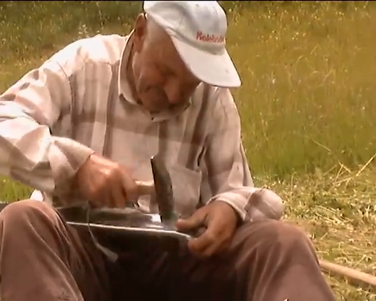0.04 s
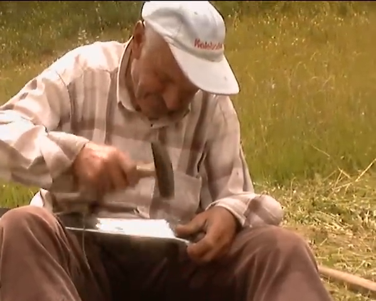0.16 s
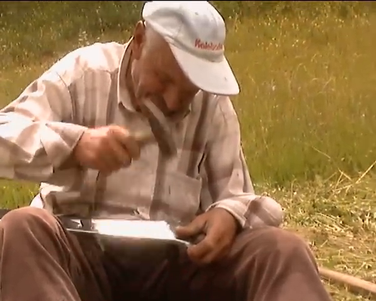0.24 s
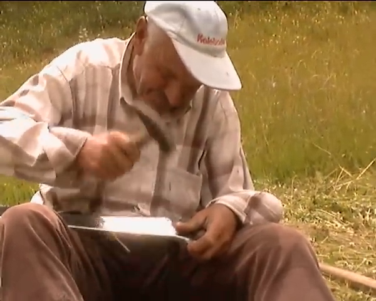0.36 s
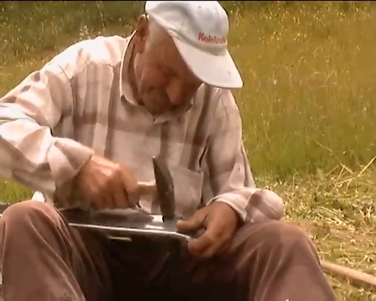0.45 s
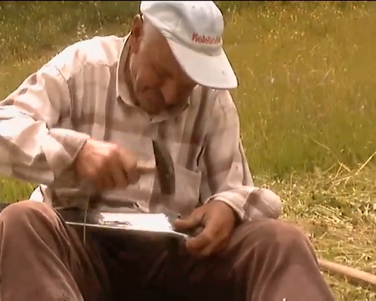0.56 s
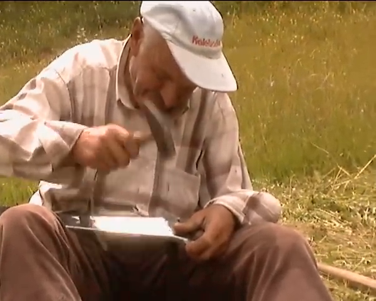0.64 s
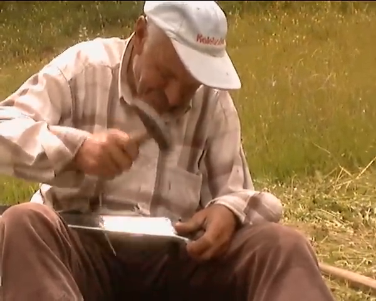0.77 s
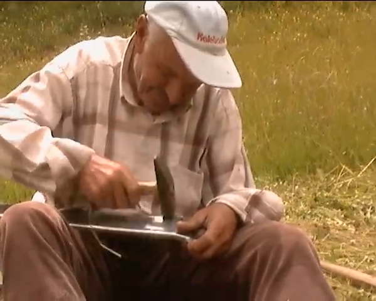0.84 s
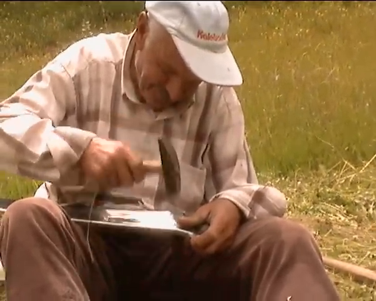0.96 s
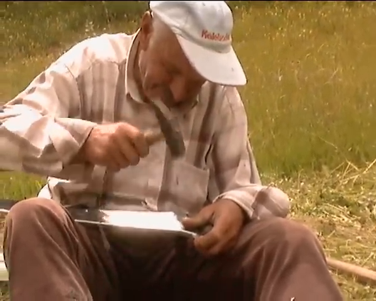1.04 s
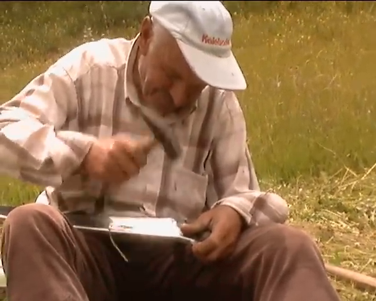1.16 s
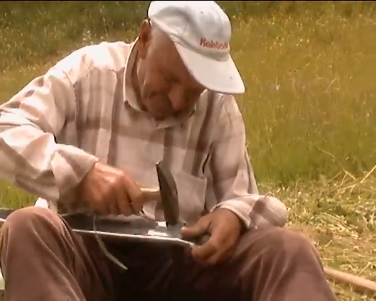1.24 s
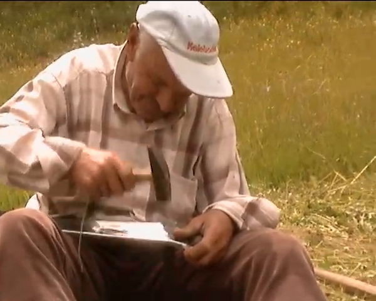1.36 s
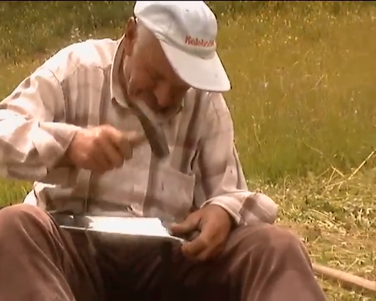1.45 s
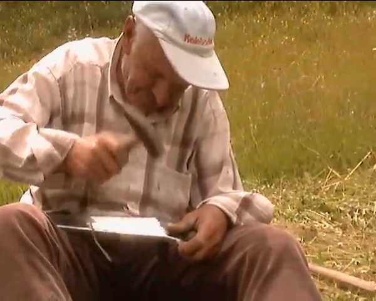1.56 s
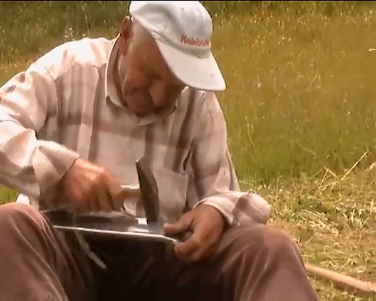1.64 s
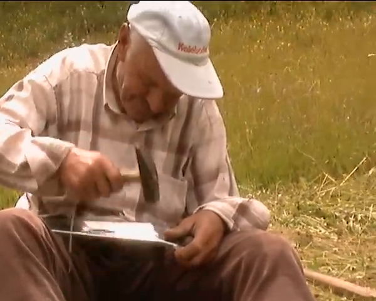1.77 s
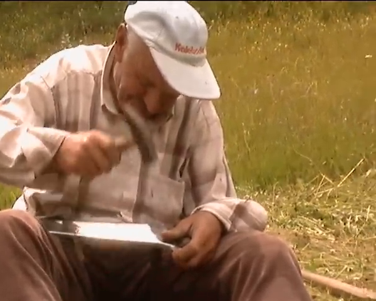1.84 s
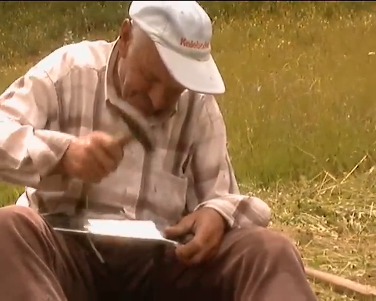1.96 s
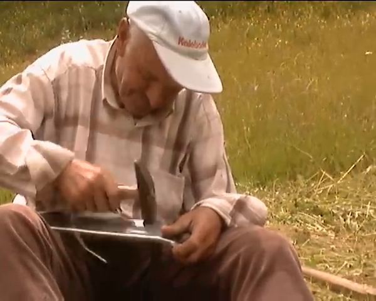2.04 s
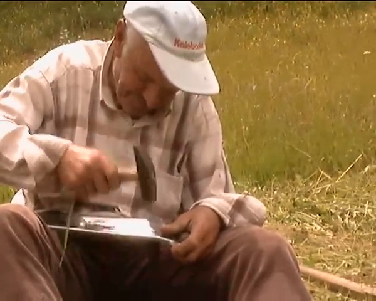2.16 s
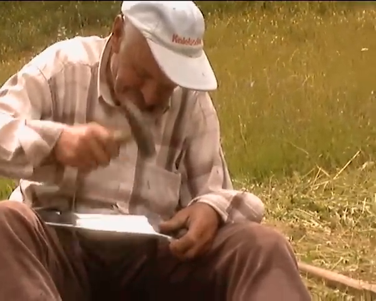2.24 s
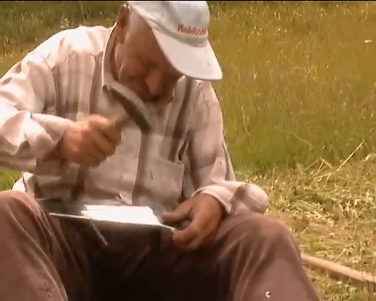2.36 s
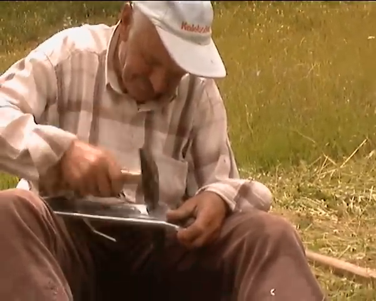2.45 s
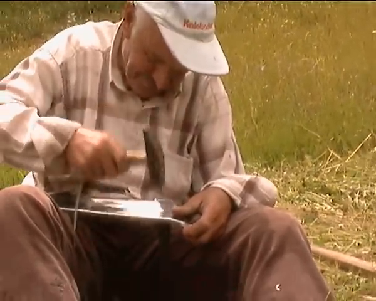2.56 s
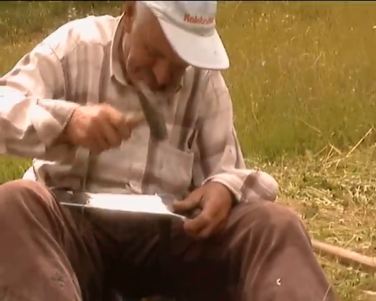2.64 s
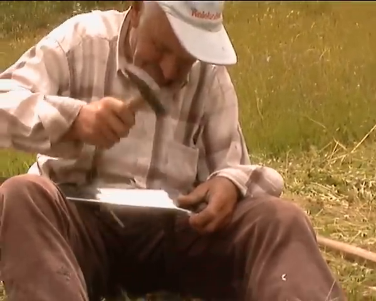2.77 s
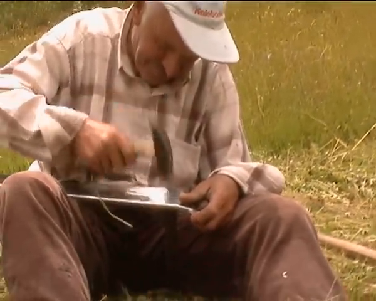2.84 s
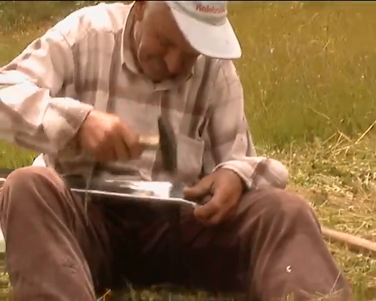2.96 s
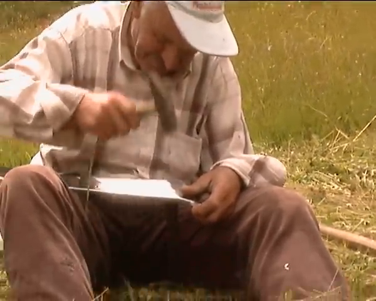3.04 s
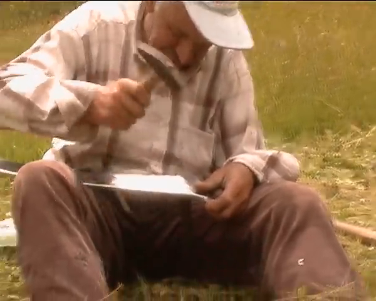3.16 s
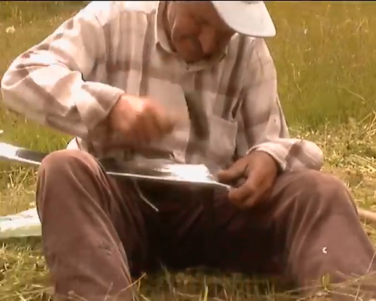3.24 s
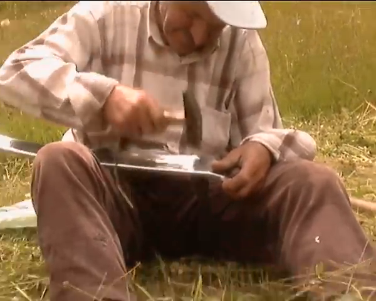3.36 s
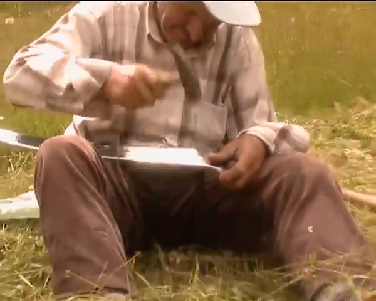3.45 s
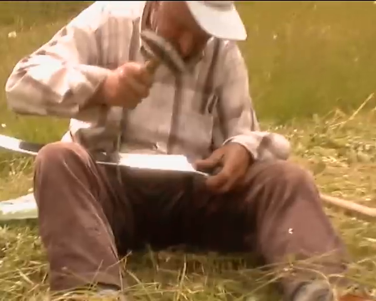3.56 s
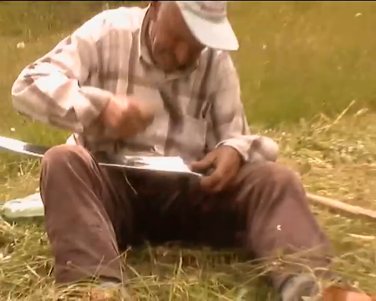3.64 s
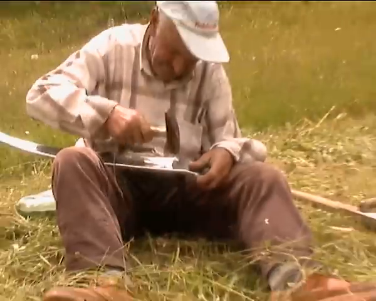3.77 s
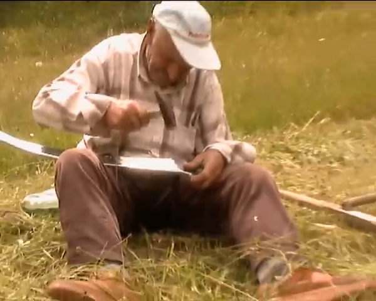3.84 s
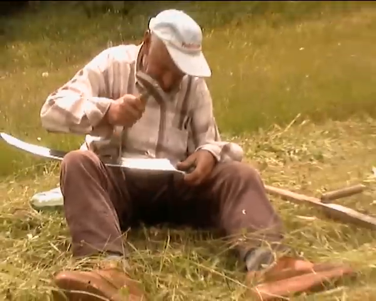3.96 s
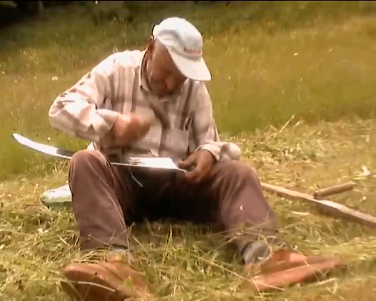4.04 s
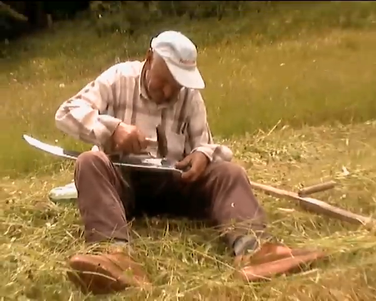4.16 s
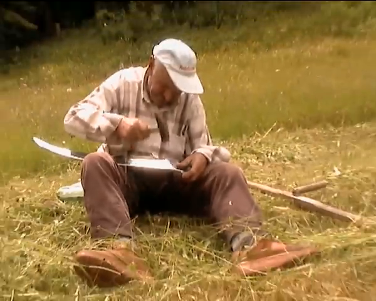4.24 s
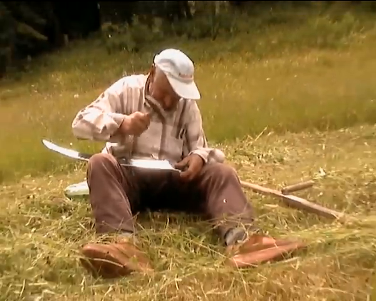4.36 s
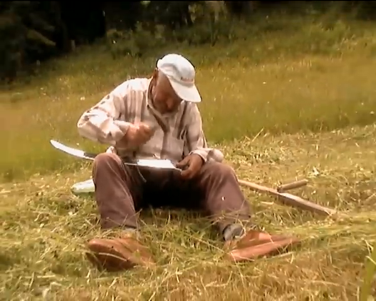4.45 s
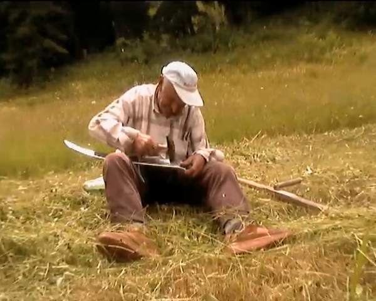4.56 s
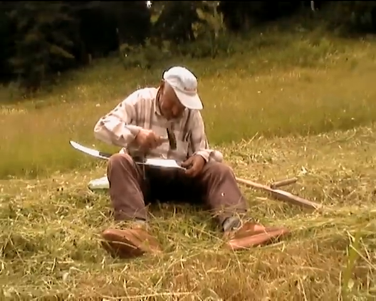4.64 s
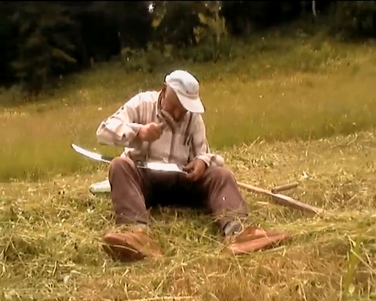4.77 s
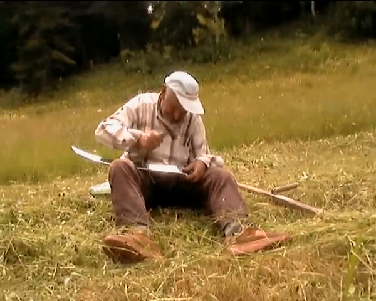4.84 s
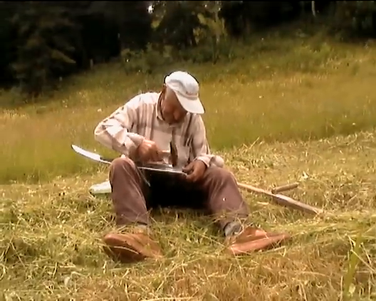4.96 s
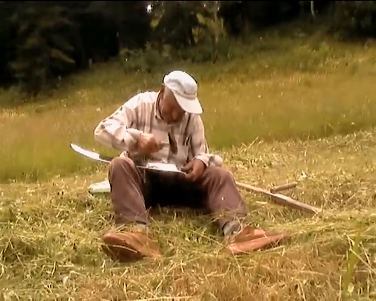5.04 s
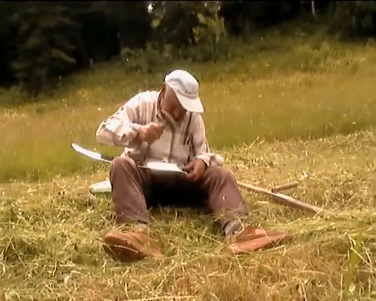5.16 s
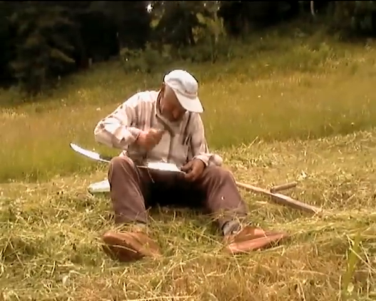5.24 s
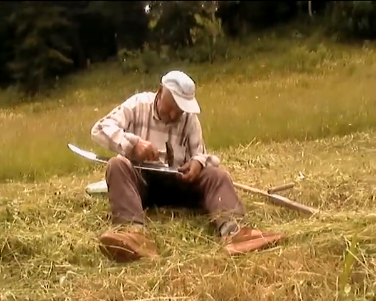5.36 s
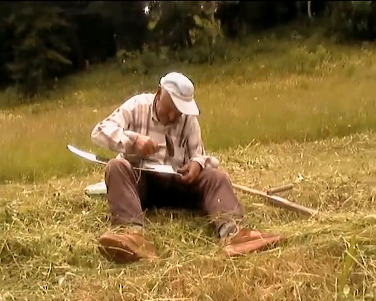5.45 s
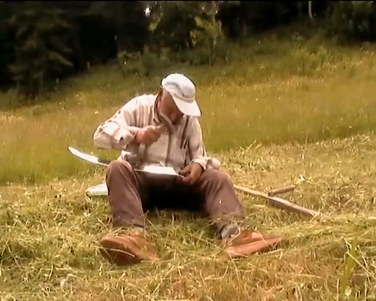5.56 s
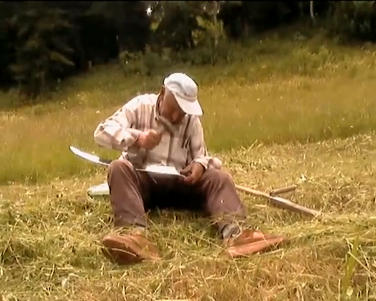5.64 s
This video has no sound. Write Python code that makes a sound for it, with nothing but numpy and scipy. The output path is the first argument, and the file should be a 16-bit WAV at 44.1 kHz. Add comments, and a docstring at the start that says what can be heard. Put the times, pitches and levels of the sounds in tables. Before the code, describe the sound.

Evenly paced hammer blows on a scythe edge, sharp crack then short shimmering ring, over faint outdoor hush and light breeze.

```python
"""A small hammer peens a scythe blade on an anvil, blow by blow, drawing out its edge in a still meadow.
Each blow is a burst of damped steel modes and grit, a thud in the soil and a softer knock as the blade drops back.
The hand-held blade rings in damped sines whose balance shifts as the edge is fed along; it also shimmers and rattles.
One blow buzzes and faint creaks pass midway, over a steady hush and a breeze made of coloured noise.
A gain control ducks the loud cracks and recovers while the blade rings."""
import sys
import numpy as np
from scipy import signal
from scipy.fft import rfft, irfft, next_fast_len
from scipy.io import wavfile
from scipy.ndimage import map_coordinates

SR = 44100
rng = np.random.default_rng(int(sys.argv[2]) if len(sys.argv) > 2 else 0)


def store_wav(level_fs):
    """Save 16-bit WAV to argv[1]."""
    pcm = np.round(np.clip(np.atleast_2d(level_fs), -1, 1) * 32767)
    wavfile.write(sys.argv[1], SR, pcm.T.astype(np.int16))


N = 251370  # length [samples]

# Levels are in dB; hammer, blade, shimmer, rattle and meadow add a loudness of their own,
# buzzes and creaks play at their table levels.
# hammer blows: (time [s], ring level [dB], low hum level [dB], singing mode [Hz], singing level [dB])
BLOWS = [(0.0612, -7.5, 5.5, 1651, -58), (0.4712, 6, 0, 1650, -46), (0.8737, 2.5, -3.5, 1653, -49.5),
         (1.266, -4, 6, 1663, -82), (1.6667, 0.5, 1.5, 1668, -54), (2.0755, 2.5, 3, 1670, -48.5),
         (2.4843, 3, -0.5, 1675, -51.5), (2.8975, 3, 8.5, 1680, -66), (3.3046, 2.5, 3, 1682, -39.5),
         (3.714, 1.5, 11, 1685, -78), (4.124, 6, 4.5, 2376, -51), (4.5397, -15.5, -0.5, 1690, -81),
         (4.946, 3.5, 4, 1695, -50.5), (5.3484, 3.5, 8, 1697, -71)]
# the edge fed over the anvil: (time [s], place along the edge [0-4])
EDGE_FEED = [(.06, .5), (.47, .2), (.87, .22), (1.27, .55), (1.67, 1.3), (2.48, 1.35), (3.3, 1.7),
             (3.7, 3.85), (4.12, 3.85), (4.54, 3.63)]
# blade modes, standing waves along the edge: (frequency at place 0 [Hz], drift [Hz per place], t60 [s],
# level at the crest [dB], place of the crest [places], distance between nodes [places])
BLADE_MODES = [(434.0, 2.2, 1.1, -53, 1.9, 2.5), (605.0, 3.1, 1.0, -51, 1.4, 1.7),
               (1298.0, -1.5, 0.45, -41, 4.5, 8.1), (1364.0, 0.0, 0.36, -33, 1.4, 3.0),
               (1478.0, 8.4, 0.33, -28, 3.0, 1.9), (1660.0, 8.0, 0.42, -26, 2.0, 1.2),
               (1805.0, 1.0, 0.22, -28, 2.0, 2.1), (1859.0, 2.9, 0.28, -26, 2.1, 1.2),
               (1932.0, 2.9, 0.28, -24, 2.6, 2.5), (1979.0, 1.0, 0.2, -28, 2.8, 5.1),
               (2260.0, 0.0, 0.18, -26, 1.9, 8.1), (2341.0, 2.7, 0.24, -30, 2.9, 2.1),
               (2366.0, 2.3, 0.42, -41, 4.5, 8.1), (2859.0, 4.6, 0.28, -35, 3.0, 5.6),
               (2992.0, 0.2, 0.45, -38, 2.7, 2.3), (3289.0, 1.9, 0.32, -30, 2.8, 1.7),
               (3486.0, -0.9, 0.36, -42, 4.4, 7.4), (3640.0, 1.9, 0.3, -27, 1.5, 2.3),
               (3940.0, -1.9, 0.25, -36, 2.9, 3.9), (4044.0, 6.7, 0.38, -38, 2.6, 2.3),
               (4191.0, 3.1, 0.35, -35, 2.0, 1.3), (4261.0, 4.8, 0.33, -28.5, 2.1, 1.0),
               (4530.0, 1.0, 0.35, -41, 2.8, 1.9), (4743.0, -0.2, 0.33, -45, 2.4, 1.7),
               (5008.0, 0.0, 0.15, -19, 2.6, 2.3), (5766.0, 0.9, 0.27, -39, 3.0, 1.9),
               (6325.0, 5.0, 0.46, -34.5, 3.1, 5.6), (6817.0, 0.0, 0.17, -30, 3.5, 7.4),
               (7557.0, 3.0, 0.27, -30, 2.6, 2.3), (8546.0, -2.0, 0.23, -36, 3.3, 6.2),
               (11120, 0, 0.17, -38, 2.5, 7), (12470, 0, 0.19, -45, 2, 7)]
# steel striking steel: (frequency [Hz], level [dB], t60 [s])
STEEL_MODES = [(1023, -13.5, 0.015), (1443, -5.5, 0.023), (2603, -2.5, 0.015), (3322, 1, 0.0089),
               (5530, 7.5, 0.0018), (7045, -9.5, 0.063), (7970, -4.5, 0.013), (12030, 2, 0.00072)]
# the anvil stake in the soil: (frequency [Hz], level [dB], t60 [s])
STAKE_MODES = [(99, -16.5, 0.044), (272, 2, 0.0089), (524, -3.5, 0.012)]
# strength of the blade's many weak modes: (frequency [Hz], level [dB])
SHIMMER_TONE = [(750, -21), (1100, -13), (1450, -22), (2100, 1), (2800, -10), (4200, -5), (6500, -4.5),
                (8500, -15.5), (12000, -17.5), (15000, -72)]
# typical decay of those weak modes: (frequency [Hz], t60 [s])
SHIMMER_T60 = [(1000, .2), (4000, .18), (8000, .17), (11000, .14), (15000, .11)]
# colour of the blade chattering on the anvil: (frequency [Hz], level [dB])
RATTLE_TONE = [(250, -4), (800, -12.5), (2100, 7), (3000, 1), (7000, 1), (12000, -14), (15000, -24)]
# the edge buzzing on the anvil: (time [s], level [dB], centre frequency [Hz])
BUZZES = [(0.112, -32, 4170)]
# creaks, each a short run of slips: (time [s], length [s], level of the first slip [dB])
CREAKS = [(3.155, .085, -44.5), (3.429, .05, -39.5), (3.53, .03, -39), (3.683, .03, -44.5)]
# colour of the creaks: (frequency [Hz], level [dB])
CREAK_TONE = [(400, -8), (750, -4.5), (1050, 2.5), (1350, -8.5), (1800, 0), (2500, -12), (3300, -9),
              (5000, -20), (10000, -31)]
# colour of the steady hush: (frequency [Hz], level [dB])
HUSH_TONE = [(15, -42), (25, -4), (516, -13), (607, -15.5), (936, -17.5), (1480, -20), (1650, -16.5),
             (1890, -20.5), (2480, -19), (3520, -19), (4370, -19.5), (5880, -18), (11300, -22),
             (14000, -30.5), (16000, -72)]
# colour of the breeze: (frequency [Hz], level [dB])
BREEZE_TONE = [(20, -3), (50, -3), (90, 0.5), (160, -12.5), (400, -50)]
# gusts on the microphone: (time [s], width [s], level over the light breeze [dB])
GUSTS = [(.3, 0.19, 2), (1.87, 0.036, 13), (2.21, 0.095, 16.5), (3.1, .17, 3)]
# treble end of the microphone chain: (frequency [Hz], level [dB])
TREBLE_ROLLOFF = [(13000, 1.5), (16000, -12.5)]
TOP_HZ = 16400  # nothing passes above this

# a blade held free takes up the blow, one lying flat passes it to the stake: dB gained per dB of ring
CRACK_PER_RING, THUD_PER_RING, REBOUND_PER_RING = 0.13, -0.23, -0.11
SHIMMER_PER_RING, RATTLE_PER_RING = 0.96, 1
REBOUND_S, REBOUND_SCATTER_S = 0.022, 0.0012  # from the blow to the blade dropping back on the anvil
SINGING_T60 = 1.04  # s; at each blow one mode escapes the damping of hand and anvil
SLIP_S, SLIP_LOSS_DB = 0.021, 1  # from one slip of a creak to the next


def amp(db):
    """Decibels to gain."""
    return 10 ** (np.asarray(db) / 20)


def unit(x):
    """Scale to rms 1."""
    return x / np.sqrt(np.mean(x ** 2) + 1e-20)


def along(points, hz):
    """Read (frequency [Hz], value) points on a log frequency axis."""
    f, v = np.transpose(points)
    return np.interp(np.log(hz + 1), np.log(f + 1), v)


def filtered(x, response):
    """Shape the spectrum of x by a response of frequency."""
    m = next_fast_len(len(x) + SR // 2)
    spectrum = rfft(x, m) * response(np.fft.rfftfreq(m, 1 / SR))
    return irfft(spectrum, m)[:len(x)]


def noise(tone):
    """Coloured noise of rms 1."""
    return unit(filtered(rng.standard_normal(N), lambda hz: amp(along(tone, hz))))


def fade(t, t60):
    """Exponential decay that falls by 60 dB in t60."""
    return np.exp(-np.log(1000) * t / t60)


def ringing(hz, t60, size):
    """One damped sine per row."""
    t = np.arange(size, dtype=np.float32) / SR
    sines = np.sin(2 * np.pi * np.float32(hz)[:, None] * t)
    return sines * fade(t, np.float32(t60)[:, None])


def knock(modes, scatter_db, detune):
    """A short knock on a few damped modes, varied each time; its energy is that of 1 ms at rms 1."""
    hz, db, t60 = np.transpose(modes)
    signs = (-1) ** np.arange(len(hz))
    gains = amp(db + scatter_db * rng.standard_normal(len(hz))) * signs
    detuned_hz = hz * (1 + detune * rng.standard_normal(len(hz)))
    x = gains @ ringing(detuned_hz, t60, size=SR // 10)
    return x / np.linalg.norm(x) * np.sqrt(SR / 1000)


def add(track, s, x):
    """Mix x into the track at time s."""
    i = round(s * SR)
    track[i:i + len(x)] += x[:max(N - i, 0)]


def meadow(hush_db=-60, breeze_db=-71, flutter_db=1.5, flutter_rate_hz=9):
    """A steady hush, and a fluttering light breeze that swells into brief gusts on the microphone."""
    t = np.arange(N) / SR
    flutter_points = rng.standard_normal(int(N * flutter_rate_hz / SR) + 4)
    flutter = map_coordinates(flutter_points, [t * flutter_rate_hz])  # smooth curve through the points
    gusts_db = sum(db * np.exp(-((t - s) / width) ** 2) for s, width, db in GUSTS)
    hush = amp(hush_db) * noise(HUSH_TONE)
    breeze = amp(breeze_db + gusts_db + flutter_db * flutter) * noise(BREEZE_TONE)
    return hush + breeze


def hammer(crack_db=-9.5, grit_db=-9, grit_t60=0.0024, thud_db=-22, rebound_db=-31.0, clack_db=-6):
    """The face cracks on the edge, the stake thuds in the soil, and the blade drops back on the anvil."""
    out = np.zeros(N)
    t = np.arange(SR // 10) / SR
    steel = lambda: knock(STEEL_MODES, scatter_db=1.5, detune=0.025)
    soil = lambda: knock(STAKE_MODES, scatter_db=1.5, detune=0.07)
    for s, ring, *_ in BLOWS:
        # the steel yields under the face
        grit = amp(grit_db) * rng.standard_normal(len(t)) * fade(t, grit_t60)
        add(out, s, amp(crack_db + CRACK_PER_RING * ring) * (steel() + grit))
        add(out, s, amp(thud_db + THUD_PER_RING * ring) * soil())
        landing = s + REBOUND_S + REBOUND_SCATTER_S * rng.standard_normal()
        rebound = soil() + amp(clack_db) * steel()
        add(out, landing, amp(rebound_db + REBOUND_PER_RING * ring) * rebound)
    return out


def blade(ring_db=1, brightness_db=4.5, singing_db=3, node_db=-14, scatter_db=2):
    """A mode rings most when struck at its crest and least at a node, so feeding the edge changes the tone."""
    out = np.zeros(N)
    hz, drift, t60, crest_db, crest, spacing = np.transpose(BLADE_MODES)
    # a narrow blade radiates its low modes poorly
    radiation_db = brightness_db * np.clip(np.log2(hz / 3000), -1, 0)
    for s, ring, hum, sing_hz, sing in BLOWS:
        place = np.interp(s, *np.transpose(EDGE_FEED))
        shape = np.hypot(np.cos(np.pi * (place - crest) / spacing), amp(node_db))
        blow_db = np.where(hz < 1000, hum, ring + ring_db)  # the modes below 1 kHz are the hum
        db = crest_db + blow_db + scatter_db * rng.standard_normal(len(hz))
        gains = shape * amp(db + radiation_db) * rng.choice([-1, 1], len(hz))
        add(out, s, gains @ ringing(hz + drift * place, t60, size=SR))
        add(out, s, amp(sing + singing_db) * ringing([sing_hz], [SINGING_T60], size=SR)[0])
    return out


def shimmer(shimmer_db=-18, count=240, uneven_db=4, t60_spread=0.12):
    """Thin sheet steel has a crowd of weak, uneven modes; each blow stirs them in new proportions."""
    out = np.zeros(N)
    hz = np.linspace(750, 15000, count) + rng.uniform(-30, 30, count)
    t60 = along(SHIMMER_T60, hz) * np.exp(t60_spread * rng.standard_normal(count))
    modes = ringing(hz, t60, size=SR // 2)
    strengths = amp(along(SHIMMER_TONE, hz) + rng.uniform(-uneven_db, uneven_db, count))
    for s, ring, *_ in BLOWS:
        gains = strengths * rng.standard_normal(count)
        gains = gains / np.linalg.norm(gains)
        add(out, s, amp(shimmer_db + SHIMMER_PER_RING * ring) * gains @ modes)
    return out


def rattle(rattle_db=-29, length_s=0.075, dwindle=1.24, count=40, mode_count=90, t60=0.06):
    """The swinging blade chatters on the anvil: tiny contacts chink on the same modes and dwindle."""
    out = np.zeros(N)
    for s, ring, *_ in BLOWS:
        hz = np.linspace(300, 15000, mode_count) + rng.uniform(-75, 75, mode_count)
        strengths = amp(along(RATTLE_TONE, hz)) * rng.standard_normal(mode_count) / np.sqrt(mode_count)
        gains = strengths * rng.standard_normal((count, mode_count))
        chinks = gains @ ringing(hz, np.full(mode_count, t60), size=SR // 12)
        shares = rng.uniform(0.03, 1, count)  # how far into the rattle each chink falls
        sizes_db = rng.normal(0, 4, count)
        for chink, share, size_db in zip(chinks, shares, sizes_db):
            gain = amp(rattle_db + RATTLE_PER_RING * ring + size_db) * (1 - share) ** dwindle
            add(out, s + share * length_s, gain * chink)
    return out


def buzzes(spread_hz=110, short_t60=0.0071, long_t60=0.46, count=7):
    """A touch of the edge on the anvil sets a cluster of close modes beating."""
    out = np.zeros(N)
    t60 = np.geomspace(long_t60, short_t60, count)  # the lowest mode lasts longest
    for s, db, hz in BUZZES:
        cluster = ringing(hz + spread_hz * np.linspace(-1, 1, count), t60, size=SR // 2)
        add(out, s, amp(db) * rng.choice([-1, 1], count) @ cluster / np.sqrt(count))
    return out


def creaks(t60=0.061, rise_s=0.0057):
    """Runs of small dry slips, each a puff of coloured noise weaker than the last."""
    level = np.zeros(N)
    t = np.arange(SR // 10) / SR
    puff = fade(t, t60) * (1 - np.exp(-t / rise_s))
    for s, length, db in CREAKS:
        for k, delay in enumerate(np.arange(0, length, SLIP_S)):
            add(level, s + delay, amp(db - SLIP_LOSS_DB * k) * puff)
    return level * noise(CREAK_TONE)


def scene():
    """Everything at one microphone in the open air."""
    blows = hammer() + blade() + shimmer() + rattle()
    return (meadow() + blows + buzzes() + creaks())[None]


def gain_control(x, threshold_db=-19, release_db_per_s=150, attack_s=0.0011):
    """The start of a crack slips through, then the gain drops and recovers while the blade rings."""
    keep = np.exp(-1 / (attack_s * SR))
    smooth = lambda v: signal.lfilter([1 - keep], [1, -keep], v)
    excess_db = np.maximum(10 * np.log10(smooth(x ** 2) + 1e-12) - threshold_db, 0)
    # hold each peak of the excess and let it fall at the release rate
    recovery_db = release_db_per_s * np.arange(N) / SR
    reduction_db = np.maximum.accumulate(excess_db + recovery_db) - recovery_db
    return x * amp(-smooth(reduction_db))


def record(dry):
    """Gain control, soft overload on the peaks, and a treble band limit."""
    x = gain_control(dry[0])
    x = x / (1 + (x / 0.8) ** 4) ** (1 / 4)  # peaks bend towards 0.8
    return filtered(x, lambda hz: amp(along(TREBLE_ROLLOFF, hz)) * (hz < TOP_HZ))[None]


dry = scene()
out = record(dry)
store_wav(out)
```